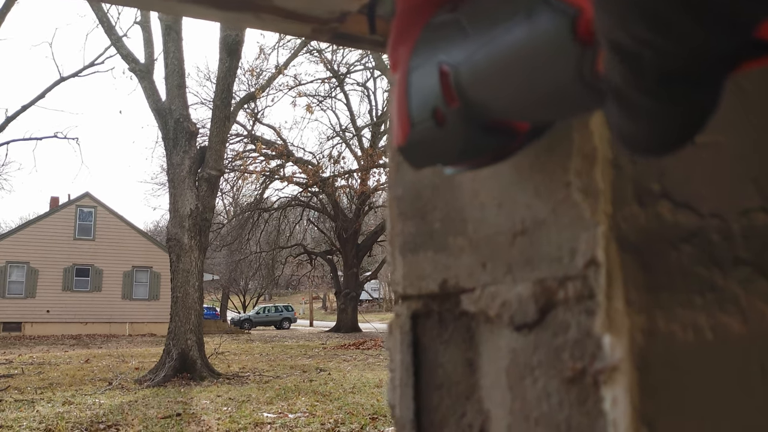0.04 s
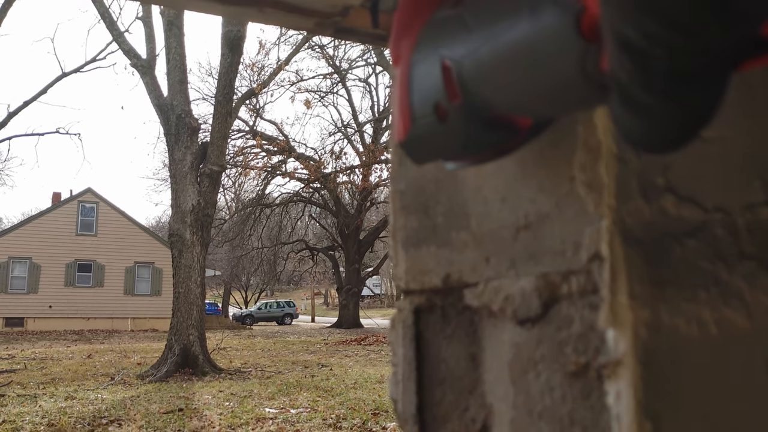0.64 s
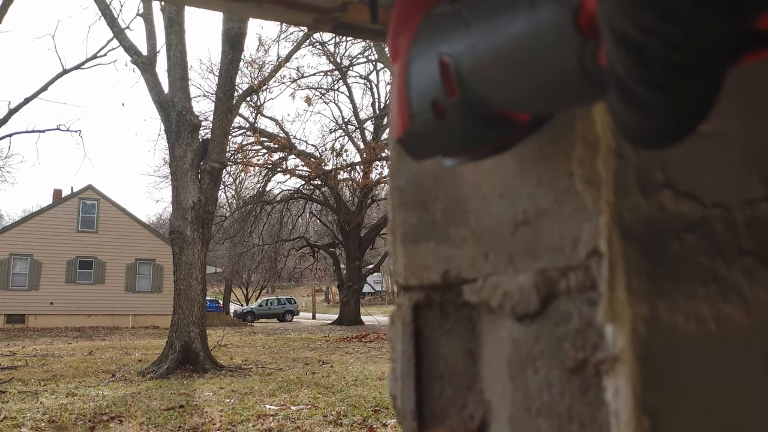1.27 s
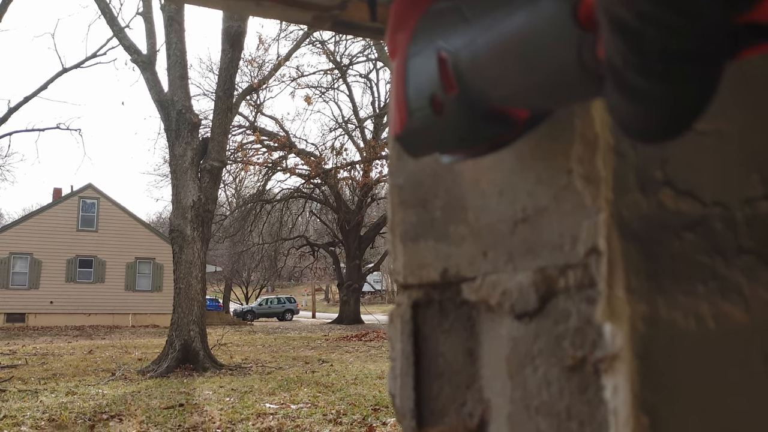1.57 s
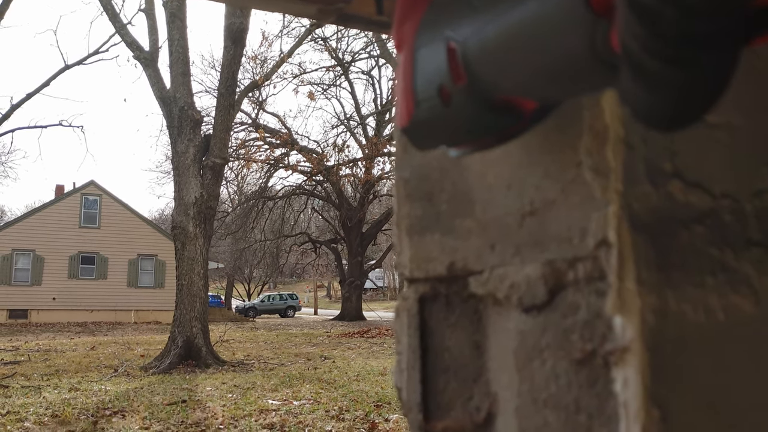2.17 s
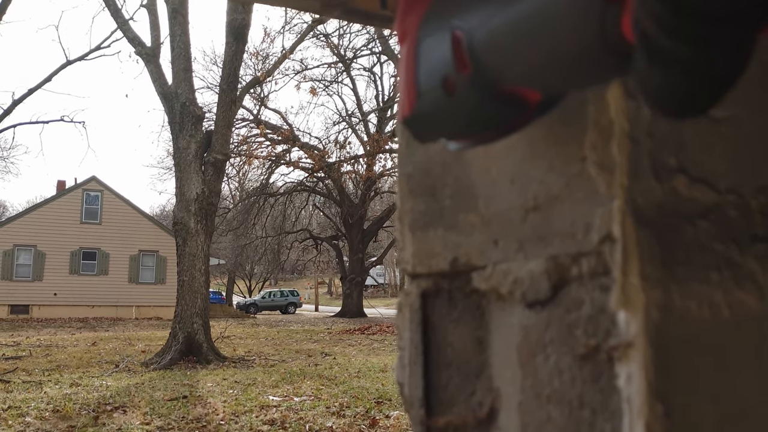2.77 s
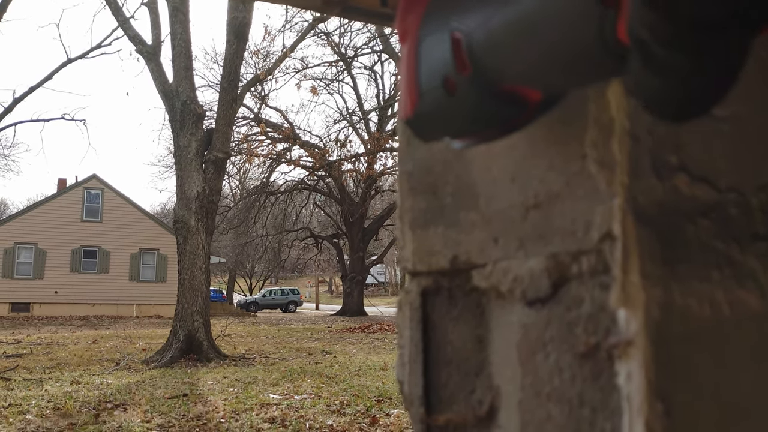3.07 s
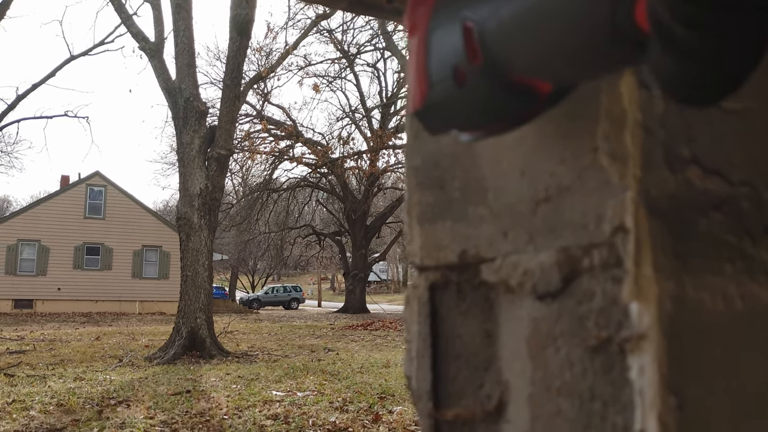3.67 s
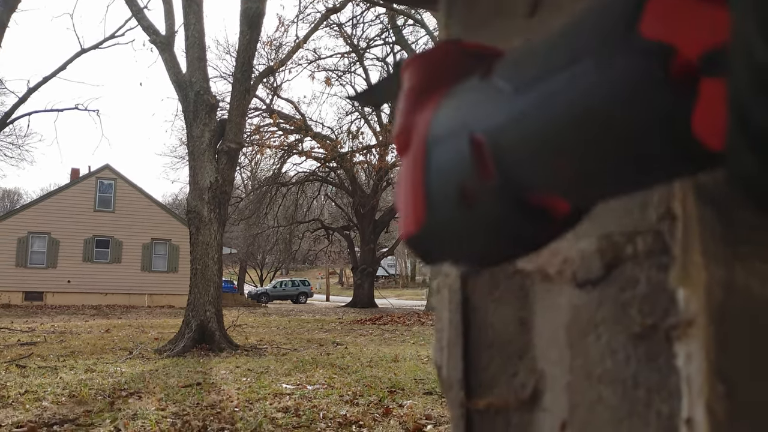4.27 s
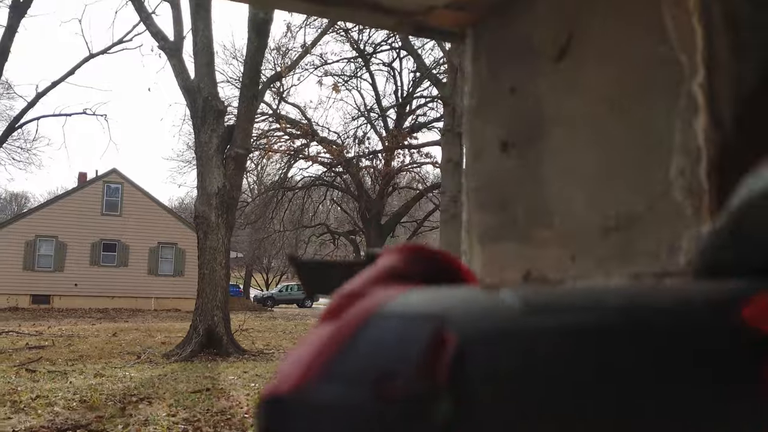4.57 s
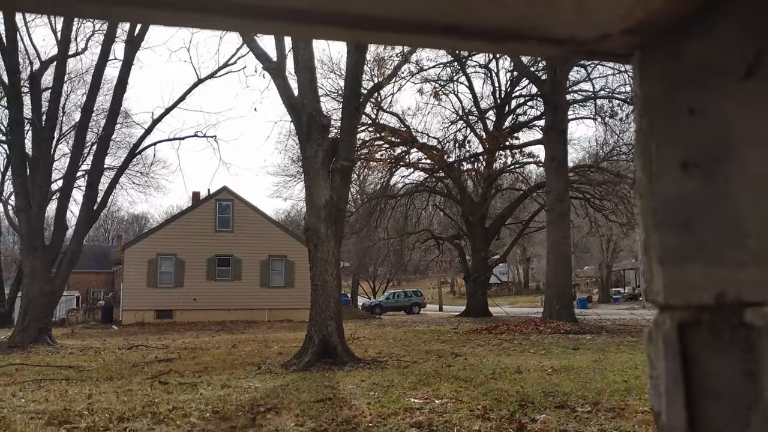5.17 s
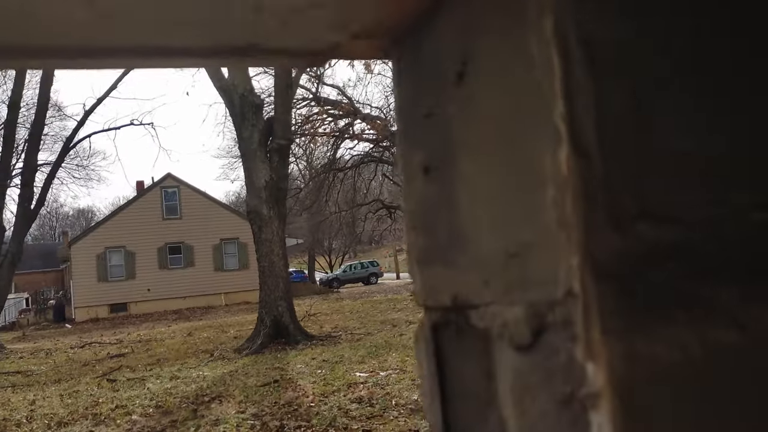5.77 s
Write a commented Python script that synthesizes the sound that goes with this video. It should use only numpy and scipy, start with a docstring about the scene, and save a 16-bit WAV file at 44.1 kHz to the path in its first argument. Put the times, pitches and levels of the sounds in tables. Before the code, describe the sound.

An oscillating power tool buzzes and rasps through nails in wood, runs free, clicks off and is set down with a thud.

```python
"""An oscillating multi-tool saws through nails in a wooden frame set in a block wall, heard close up.
Its periodic stroke forces casing, board and blade into a harmonic buzz; friction of the teeth adds a rasp.
The blade skips, breaks through, grazes the nail once more and swings free. The switch clicks, the motor
rattles to rest, the blade rings on in free vibration, and the tool lands on boards with a thud.
Behind it lie the faint air of a yard and a distant hum."""
import sys
import numpy as np
from scipy import signal
from scipy.fft import rfft, irfft
from scipy.io import wavfile

SR = 44100
rng = np.random.default_rng(int(sys.argv[2]) if len(sys.argv) > 2 else 0)


def master_out(mix):
    """Clip the mix to full scale and print it as 16-bit PCM to the path in sys.argv[1]."""
    frames = np.transpose(np.atleast_2d(mix))
    ceiling = np.clip(frames, -1, 1)
    pcm = np.round(ceiling * 32767).astype(np.int16)
    wavfile.write(sys.argv[1], SR, pcm)


N = 261954
TIME = np.arange(N) / SR
FRAMES = np.arange(0, N + 128, 128) / SR  # coarse time grid for slow changes
STROKE_HZ, BUZZ_FADE_DB = 243.5, -120  # running speed; level change by the end of the coast

# depth of the blade in the cut: time_s, depth (0-1)
CUT_DEPTH = [(1.8, 0.12), (2.1, 1)]
# effort of the hand: time_s, push_db
HAND_PUSH = [(0, 3.5), (1.1, 2.5), (1.35, 3), (1.8, 1.94), (2.3, 3.5), (2.9, 0.5), (3.1, 4), (3.25, 1.5),
             (3.52, 3), (3.75, 1)]
# the free tool swinging past the microphone: time_s, body_db, treble_db
FREE_SWING = [(4.2, -7, -3.5), (4.48, -6, -1.5), (4.63, 1, 1), (4.76, 0, 3), (4.9, -3, 2)]
# slack parts knocking as the motor coasts: time_s, level_db
COAST_KNOCKING = [(4.91, -100), (4.95, -55), (5.02, -72), (5.08, -57.5), (5.14, -87), (5.18, -110)]


def buzz(turns, hop, level_db=-0.82):
    """Forced vibration: a periodic stroke excites harmonics, recoloured by the load on the blade."""
    # stroke spectrum: harmonic, then left_db, right_db for each of shallow cut, deep cut, free blade
    harmonics = [(1, -48, -48, -52, -54, -63, -53), (2, -68, -68, -61, -59, -61, -53),
                 (3, -62, -57, -61, -55, -63, -63), (4, -47, -56, -48, -53, -59, -52),
                 (5, -45, -48, -46, -50, -64, -58), (6, -49, -65, -52, -59, -62, -51),
                 (7, -66, -63, -57, -54, -61, -47), (8, -52, -46, -53, -47, -61, -55),
                 (9, -56, -50, -56, -54, -59, -58), (10, -51, -49, -53, -45, -60, -53),
                 (11, -54, -50, -51, -52, -56, -52), (12, -53, -49, -57, -53, -63, -55),
                 (13, -52, -51, -56, -53, -66, -55), (14, -63, -66, -63, -64, -68, -62),
                 (15, -54, -53, -56, -56, -63, -61), (16, -60, -57, -62, -59, -71, -60),
                 (17, -57, -60, -61, -62, -67, -59), (18, -55, -59, -56, -59, -68, -65),
                 (19, -61, -57, -64, -62, -68, -64), (20, -58, -63, -55, -69, -66, -64),
                 (21, -56, -57, -54, -57, -60, -55), (22, -65, -66, -60, -62, -67, -63),
                 (23, -63, -64, -60, -60, -69, -67), (24, -62, -64, -66, -60, -70, -66),
                 (25, -75, -71, -63, -66, -74, -66), (26, -67, -61, -65, -60, -69, -63),
                 (27, -65, -62, -65, -60, -74, -69), (28, -66, -74, -62, -66, -74, -75)]
    # phase lead of the left channel: frequency_hz, cutting_rad, free_rad
    phase_lead = [(243, .7, -.2), (730, .9, -.5), (973, 0, -.5), (1217, 2.6, -1), (1460, 0, 1.5),
                  (1704, -3, .9), (2190, -3.1, .1), (2433, -4.1, -1.3), (2676, -6.5, 1.2), (2920, -8, -.1),
                  (3163, -8.2, .6), (3650, -5.9, 1.5), (4400, -6.3, -1.4), (6800, -6.6, .4)]
    speed_hz = motor(FRAMES)
    load, depth = contact(FRAMES)[0], curves(CUT_DEPTH, FRAMES)[0]
    parts_db = np.repeat(excitation(), [1, 2, 5, 20], axis=0)  # harmonics per part
    response = [(k * STROKE_HZ, *db) for k, *db in harmonics]  # resonances stay put as the motor slows
    skip = jolts()[1] * np.cos(np.pi * turns + 0.16 * wander(4.4, TIME))  # half the stroke rate
    limp = hop * (1 + skip)
    scatter = slipping() * np.interp(turns, np.arange(len(FRAMES)), rng.standard_normal(len(FRAMES)))
    shift_turns = .011 * (hop - 1) + .027 * skip + .016 * scatter
    flutter = 0.021 + 0.1 * jolts(FRAMES)[0]
    stroke = np.exp(2j * np.pi * (turns + shift_turns))
    wave, out = 1, np.zeros((2, N))
    for k, part_db in enumerate(parts_db, 1):
        wave, hz = wave * stroke, k * speed_hz
        shallow_db, deep_db, free_db = spectra(response, hz).reshape(-1, 2, len(hz))
        cutting_db = (1 - depth) * shallow_db + depth * deep_db
        db = load * cutting_db + (1 - load) * free_db + part_db + level_db
        tone = wave if k > 2 else np.exp(2j * np.pi * k * turns)  # the lowest two keep an even beat
        loose = min(k / 7, 1.2) * (.95 + .05 * load)  # high harmonics feel every change of contact
        lead_cut, lead_free = np.exp(1j * spectra(phase_lead, hz))
        lead = np.angle(load * lead_cut + (1 - load) * lead_free)
        # free strokes are sharper slaps; in the cut they smear over the cycle
        phase = rng.standard_normal() * (1.6 + .6 * load) + .3 * loose * wander(2)
        drift = amp(1.1 * loose * wander(3))
        shake = drift * (1 + flutter * loose * (wander(22) + 1j * wander(30)))
        # the board follows every skip and hop; low hum and blade whine only sway
        sway = 1 + 0.23 * (hop - 1) if k < 3 else limp if k < 8 else 1 + 0.12 * (limp - 1)
        for ear, side in enumerate((.5, -.5)):
            gain = amp(db[ear] + 1.3 * loose * wander(3)) * shake * np.exp(1j * (phase + side * lead))
            out[ear] += np.sqrt(2) * (np.interp(TIME, FRAMES, gain) * tone).real * sway
    return out


def motor(t=TIME, sag_hz=1.0, waver_hz=.15):
    """Stroke rate in Hz: it sags as the loaded blade skips, then runs down on inertia."""
    held_hz = STROKE_HZ - sag_hz * jolts(t)[1] * contact(t)[0] + waver_hz * wander(2, t)
    return held_hz * np.maximum(1 - coasted(t), 0) ** 1.15


def coasted(t=TIME, off_s=4.92, coast_s=.26):
    """Progress of the inertial run-down: 0 under power, passing 1 at standstill."""
    return np.maximum(t - off_s, 0) / coast_s


def contact(t=TIME):
    """Contact force on the blade, and the degree of grazing, which peaks at half load."""
    # pressure on the nail: time_s, load (0-1)
    blade_load = [(3.77, .97), (3.8, .3), (4.01, .3), (4.035, .55), (4.15, .55), (4.18, 0)]
    load = np.clip(curves(blade_load, t)[0], 0, 1)
    return load, 4 * load * (1 - load)


def excitation(t=FRAMES, severing_s=2.6, severing_rise_s=0.044):
    """Response to the driving force, in dB: low hum, casing drone, board buzz and blade whine."""
    # casing, board and blade: rest_db, db_per_push_db, full_skip_db, grazing_db
    parts = [(1, 0, -2.5, 2), (0.54, 0.61, -0.5, -6.5), (-4.5, 1.77, -1, -2.5)]
    # the fundamental: time_s, level_db
    low_hum = [(0, 1.5), (1.95, 1.5), (2.12, -1), (2.26, 5), (2.75, -4), (3.26, 4.5), (3.52, -2.5),
               (3.77, -1), (3.88, -3.5), (4.54, -10.5), (4.66, 6), (4.9, 2.5)]
    load, graze = contact(t)
    push, skip = curves(HAND_PUSH, t)[0], jolts(t)[1]
    body_db, treble_db = curves(FREE_SWING, t)
    casing, board, whine = [
        rest_db + load * follow * push + skip_db * skip + graze_db * graze + (1 - load) * swing_db
        for (rest_db, follow, skip_db, graze_db), swing_db in zip(parts, (body_db, body_db, treble_db))]
    whine = whine + load * np.clip((t - severing_s) / severing_rise_s, 0, 1)  # 1 dB up late in the cut
    return np.array([curves(low_hum, t)[0], casing, board, whine]) + BUZZ_FADE_DB * coasted(t) ** 2


def jolts(t=TIME, steady_hop=0.016, steady_skip=0.0405):
    """Intermittent contact: how far the tool hops and the blade skips every second stroke."""
    # losses of grip: start_s, length_s, hop (0-1), skip (0-1)
    lost_grip = [(.05, .22, .3, .1), (.27, .38, .56, .05), (.66, .13, .15, .35), (.79, .4, .17, .06),
                 (1.19, .28, .22, .05), (1.48, .19, .2, .7), (1.68, .13, .1, .5), (2.1, .29, .2, .02),
                 (2.44, .06, .1, .5), (3.06, .13, .42, .7), (3.2, .14, .25, .2), (3.42, .25, .25, .65),
                 (3.8, .23, .3, .4)]
    steady = np.outer([steady_hop, steady_skip], contact(t)[0])
    return np.clip(steady + spells(lost_grip, edge_s=0.038, t=t), 0, 1)


def bounce(depth=.9):
    """Amplitude modulation: the tool hops once in a few strokes, landing hard and easing off."""
    # pace of the hopping: time_s, rate_hz
    hop_rate = [(0, 56), (.6, 58), (.85, 68), (1.35, 76), (1.65, 52), (2.3, 63), (3.7, 70), (3.85, 40)]
    rate_hz = curves(hop_rate)[0] * (1 + .04 * wander(13.0, TIME))
    angle = 2 * np.pi * np.cumsum(rate_hz) / SR
    return np.maximum(1 + depth * jolts()[0] * (np.sin(angle) + .2 * np.sin(2 * angle)), 0)


def slipping():
    """Timing jitter, 0-1: the strokes scatter when the teeth leave their groove."""
    # jumps from the groove: start_s, length_s, scatter (0-1)
    slips = [(.26, .1, .55), (.46, .07, .5), (.69, .08, .7), (.88, .08, .45), (1.08, .08, .35),
             (1.24, .09, .6), (1.48, .33, .6), (2.17, .07, .4), (2.44, .06, .5), (2.72, .05, .25),
             (3.04, .15, 1), (3.19, .22, .55), (3.41, .23, .95), (3.64, .07, .4), (3.79, .04, .6),
             (3.92, .09, .5)]
    return np.clip(spells(slips, edge_s=.035)[0], 0, 1)


def rasp(turns, hop, split_hz=7700, grain_db=2.0):
    """Friction noise: each bite tears off chips, giving a rasp, a fine fizz and knocks in the board."""
    # friction spectrum: frequency_hz, cutting_left_db, cutting_right_db, free_left_db, free_right_db
    grit = [(493, -29.5, -16, -25, -6.5), (830, -26, -18, -29, -20.5), (944, -4.5, -10, 0.5, 0.5),
            (1370, -12.5, -7, -6, 0), (2340, -4, -1, -24, 0), (2550, -5, -6, -10.5, 0.5),
            (3340, -6.5, -5, -7.5, 0.5), (5110, -6, -9.5, -7, -6), (5500, -4.5, -6.5, -5.5, -3),
            (7730, -12, -11.5, -11.5, -17), (8640, -5, -27, -19, -22), (9970, -14, -17.5, -12, -13.5),
            (12120, -3.5, -7.5, -13, -23), (11600, -10, -15, -18, -10), (14600, -13.5, -12.5, -23.5, -25.5)]
    # response of the board: frequency_hz, gain_db
    wood = [(30, -26), (80, -13.5), (130, -10), (190, 17.5), (280, 10.5), (380, -13.5), (600, 10),
            (750, 16), (1000, -48), (2000, -12)]
    rasp_db, fizz_db, knock_db = friction()
    load, bite = contact()[0], bites(turns)
    chips = unit(amp(grain_db * np.repeat(rng.standard_normal(N // 16 + 1), 16)[:N]))
    metal = 0
    for kind, db, sway in (("low", rasp_db + 0.02, np.sqrt(hop)), ("high", fizz_db, 1)):
        scrape = retrace(pair(0.057), turns) * bite * chips * sway
        coloured = colour(np.vstack([scrape, scrape]), grit)
        cutting, free = band(coloured, split_hz, kind).reshape(2, 2, N)
        metal = metal + amp(db) * (load * unit(cutting) + (1 - load) * unit(free))
    knocking = amp(knock_db - 2) * unit(colour(pair(0.87) * bite * hop, wood))
    return band(metal, 520, "high", order=3) + knocking


def bites(turns, decay_turns=0.23, back=0.91, floor=0.69):
    """A pulse train: the teeth bite on the forward stroke and more lightly on the way back."""
    half = (2 * turns).astype(int)
    strength = np.where(half % 2, back, 1) * (1 + 0.4 * jolts()[1] * np.cos(np.pi * (half // 2)))
    return unit(floor + strength * np.exp(-(turns % .5) / decay_turns))


def retrace(noise, turns, shallow=.5, deep=.56, free=.78):
    """Comb filtering: in one groove each stroke partly repeats the last, so the hiss takes on a pitch."""
    stroke_before = np.minimum(np.searchsorted(turns, turns - 1 - .5 * np.gradient(turns)), N - 1)
    load, depth = contact()[0], curves(CUT_DEPTH)[0]
    memory = load * (shallow + (deep - shallow) * depth) + (1 - load) * free
    memory = np.clip(memory * (1 - slipping()) * (1 - 2 * coasted()), 0, 1) * (turns > 1)
    fresh, out = np.sqrt(1 - memory ** 2) * noise, noise
    for _ in range(8):
        out = fresh + memory * out[:, stroke_before]
    return unit(out)


def friction(shudder_db=7):
    """Friction follows contact force: dB of rasp, fizz and knocking, which die with the motor."""
    # rasp, fizz and knocking: cutting_db, free_db, db_per_push_db, full_hop_db
    levels = [(-43.5, -50.5, 1.07, 0), (-45.5, -64, 1.54, -1.5), (-65.5, -72, 1.5, 11.5)]
    load, hop, slowed = contact()[0], jolts()[0], coasted() ** 2
    push, treble_db = curves(HAND_PUSH)[0], curves(FREE_SWING)[1]
    coarse, fizz, knock = [
        load * (cut_db + follow * push) + (1 - load) * (free_db + treble_db) + hop_db * hop
        for cut_db, free_db, follow, hop_db in levels]
    knock = np.maximum(knock, curves(COAST_KNOCKING)[0] + shudder_db)  # braking shakes the board too
    return (coarse + scraping() - 44 * slowed,
            fizz + scraping() - 77.5 * slowed,
            knock + BUZZ_FADE_DB * slowed)


def scraping():
    """Sliding friction changes, in dB, as the teeth glide or the tip scratches the cut end."""
    # glides and scratches: start_s, length_s, change_db
    scrapes = [(-.03, 0.065, -1.5), (1.92, 0.22, -1.5), (2.75, 0.25, 0.5), (3.05, 0.1, -0.5),
               (3.86, 0.022, 3.5), (4.045, 0.085, 2.5)]
    return spells(scrapes, edge_s=0.0067)[0]


def squeal(x, share=1):
    """Resonance: as the grip changes, modes of nail, board or blade lift the sound near their pitch."""
    # resonances singing out: start_s, length_s, pitch_hz, width_hz, lift_db
    resonances = [(-.05, .55, 3655, 120, 4), (.19, .43, 1950, 130, 3), (.27, .6, 2920, 130, 4.5),
                  (.25, .6, 4385, 130, 3), (.66, .13, 1460, 120, 5), (.98, .49, 2680, 130, 5),
                  (1.18, .24, 975, 120, 4.5), (1.2, .68, 3655, 130, 4), (1.46, .24, 1400, 250, 4),
                  (1.46, .34, 2900, 250, 3), (1.79, .12, 2670, 150, 4), (1.94, .22, 2920, 160, 8.5),
                  (1.94, .25, 3165, 130, 7.5), (1.92, .3, 2450, 200, 4.5), (2.21, .21, 2680, 450, 6.5),
                  (2.43, .45, 2440, 170, 9), (1.92, .2, 6570, 300, 8), (2.72, .3, 1945, 120, 4),
                  (2.78, .24, 4870, 200, 8), (2.8, .22, 4385, 150, 6.5), (2.88, .17, 2435, 180, 4),
                  (3.08, .08, 2250, 700, 3), (3.41, .24, 605, 80, 7), (3.83, .08, 2435, 100, 7),
                  (4.03, .14, 2435, 90, 15), (4.035, .135, 7400, 700, 6), (4.16, .22, 1705, 120, 6),
                  (4.38, .26, 1705, 120, 2.5), (4.5, .36, 2500, 300, 3), (4.54, .18, 1465, 120, 6.5),
                  (4.7, .22, 730, 90, 4), (4.7, .24, 5115, 200, 5), (4.7, .24, 6330, 200, 6)]
    for start_s, length_s, hz, width_hz, db in resonances:
        x = lift(x, hz, width_hz, share * spells([(start_s, length_s, db)], edge_s=.05)[0])
    return x


def blade_knocks():
    """Impact: the blade strikes the board as it breaks through."""
    # strikes: start_s, level_db
    strikes = [(3.805, -44.5), (3.94, -42), (3.981, -43), (4.022, -44)]
    # response of the struck board: frequency_hz, gain_db
    response = [(100, -33), (250, 9), (400, -12), (650, 9), (1000, -2), (1700, 1), (3000, -10), (8000, -37)]
    force = bursts([(s, db - 1, .005) for s, db in strikes])
    return colour(pair(0.51) * force, response)


def fan_and_blade(turns, blade_hz=7553, free_db=-81, graze_db=-66, release_s=5.1, decay_db_per_s=100):
    """The fan's tones follow the motor; the blade rings at its natural frequency, most when grazing."""
    # whistle of the cooling fan: stroke_multiple, level_db
    fan_tones = [(39, -76), (52, -86)]
    running = np.interp(TIME, FRAMES, amp(np.minimum(excitation()[3], 0)))
    load, graze = contact()
    fan = sum(amp(db + 2 * wander(14, TIME)) * np.sin(2 * np.pi * k * turns + 0.48 * wander(20, TIME))
              for k, db in fan_tones)
    struck = (1 - load) * amp(free_db) + graze * 2 * load * amp(graze_db + scraping())
    fade = amp(-decay_db_per_s * np.maximum(TIME - release_s, 0))
    ring = struck * fade * np.sin(2 * np.pi * blade_hz * TIME + 2.5 * running * wander(60, TIME))
    return np.sqrt(2) * (fan * running + ring * amp([[2], [-3]]))


def rattle(turns):
    """Impulse response: each slowing half stroke knocks the gear casing, whose damped modes ring."""
    # modes of the casing: pitch_hz, level_db, t60_s
    modes = [(1250, -5, .02), (1615, 0, .03), (2060, -7, .13), (2470, -3, .025), (3100, -3, .015),
             (3630, 0, .016), (5020, -10, .04)]
    reversals = np.diff(np.floor(2 * turns), prepend=0) > 0
    knocks = reversals * amp(3 * rng.standard_normal(N) + curves(COAST_KNOCKING)[0])
    t = TIME[:SR // 8]
    ring = sum(amp(db - 60 * t / t60) * np.sin(2 * np.pi * (hz * t + rng.random((2, 1))))
               for hz, db, t60 in modes)
    ring = unit(ring) * np.sqrt(SR / STROKE_HZ / len(t))
    return signal.oaconvolve(knocks[None], ring, axes=1)[:, :N] * amp([[-4], [2]])


def switch_clicks():
    """Brief impacts have broad spectra: the switch snaps and the drive gives its last knocks."""
    # clicks: start_s, level_db, decay_s
    clicks = [(4.891, -29, 0.0014), (5.053, -49, 0.0044), (5.078, -79.5, 0.0038), (5.12, -78, .002),
              (5.14, -83, 0.0019)]
    # their spectrum: frequency_hz, gain_db
    response = [(100, -22), (300, -10), (900, -9), (2300, 0), (4000, -2), (6500, -1), (8000, -17),
                (15000, -26)]
    return colour(pair(0.11) * bursts(clicks), response) * amp([[-2], [2]])


def frame_bumps():
    """Soft impacts excite low frequencies: the tool's body bumps the frame."""
    # bumps: start_s, level_db, decay_s
    bumps = [(3.08, -68, 0.054), (3.14, -56, 0.046), (3.24, -67, 0.081), (3.59, -53.5, 0.034),
             (4.73, -68, 0.067)]
    # their spectrum: frequency_hz, gain_db
    response = [(30, -42), (70, -25), (110, -8.5), (150, -5), (250, -9), (800, -39)]
    return colour(pair(0.89) * bursts(bumps), response)


def thud(modes_db=-14, room_db=-8):
    """Impact excites normal modes: the tool lands on one edge, then flat, and the boards boom."""
    # landings: start_s, level_db, decay_s
    landings = [(5.669, -66, .008), (5.6785, -38, .004), (5.688, -37, .006), (5.697, -37, .004),
                (5.716, -46, .005)]
    # spectrum of the blow: frequency_hz, gain_db
    response = [(24, -45), (40, -12), (84, -8), (442, -2), (532, 0), (718, -17), (884, -9), (1370, -27.5),
                (1500, -25), (2810, -29), (3080, -34), (4060, -42), (10000, -71), (13000, -106),
                (22000, -120)]
    # modes of the boards: pitch_hz, level_db, t60_s
    modes = [(83, 0, 0.33), (179, -2.5, 0.19), (400, -10.5, 1), (483, -17, 0.3), (621, -17, 0.8),
             (634, -19, 0.3), (890, -27, .35)]
    force, t = bursts(landings), TIME[:SR // 2]
    blow = colour(pair(0.53) * force, response)
    ring = sum(amp(db - 60 * t / t60) * np.sin(2 * np.pi * hz * t) for hz, db, t60 in modes)
    onsets = np.maximum(np.diff(force, prepend=0), 0)
    boom = signal.fftconvolve(onsets, ring)[:N]
    return (blow + amp(room_db) * room(blow) + amp(modes_db) * boom) * amp([[-2], [2]])


def room(x):
    """Reverberation: a diffuse tail between block walls, each band decaying at its own rate."""
    # reverberation time: frequency_hz, t60_s
    decay_times = [(70, 0.29), (180, 1), (490, 0.45), (1290, 0.58), (3400, .33), (8000, 0.87)]
    hz, t, noise = signal.stft(rng.standard_normal((2, SR // 2)), SR, nperseg=256)
    tail = signal.istft(noise * amp(-60 * t / spectra(decay_times, hz).T), SR, nperseg=256)[1]
    tail = tail + .5 * tail[::-1]
    return signal.fftconvolve(x, tail / np.linalg.norm(tail[0]), axes=1)[:, :N]


def yard(air_db=-92.5):
    """Ambient noise: still air and the wavering tones of a distant hum."""
    # spectrum of the air: frequency_hz, gain_db
    air = [(18, -73.5), (30, -26.5), (59, -26.5), (71, -21.5), (122, -4), (147, -28), (185, -33),
           (355, -15.5), (394, -29.5), (15000, -51)]
    # distant hum: pitch_hz, level_db
    tones = [(91.5, -104), (119, -98), (242, -113), (360.7, -107)]
    hum = sum(amp(db + wander(7.2, TIME)) * np.sqrt(2) * np.sin(2 * np.pi * (hz * TIME + rng.random()))
              for hz, db in tones)
    return amp(air_db) * unit(colour(pair(0.38), air)) + hum


def amp(db):
    """Decibels to amplitude."""
    return 10 ** (np.asarray(db) / 20)


def unit(x):
    """Normalisation to rms 1."""
    return x / np.sqrt(np.mean(abs(x) ** 2) + 1e-30)


def curves(rows, t=TIME):
    """Linear interpolation of a table's columns in time."""
    s, *columns = np.transpose(rows)
    return [np.interp(t, s, c) for c in columns]


def spectra(rows, hz):
    """Interpolation of a table's columns in log frequency."""
    f, *columns = np.transpose(rows)
    return np.array([np.interp(np.log(hz + 1), np.log(f + 1), c) for c in columns])


def spells(rows, edge_s, t=TIME):
    """Trapezoidal envelopes: the values in each row swell, hold and fade."""
    return sum(np.outer(values, np.clip(.5 + np.minimum(t - s, s + length - t) / edge_s, 0, 1))
               for s, length, *values in rows)


def bursts(rows):
    """Sudden onsets with exponential decay."""
    return sum(amp(db) * (TIME >= s) * np.exp(-abs(TIME - s) / decay) for s, db, decay in rows)


def wander(rate_hz, t=FRAMES):
    """Random drift: low-passed noise of rms 1."""
    noise = rfft(rng.standard_normal(len(FRAMES)))
    hz = np.fft.rfftfreq(len(FRAMES), FRAMES[1])
    return np.interp(t, FRAMES, unit(irfft(noise / (1 + (hz / rate_hz) ** 2), len(FRAMES))))


def pair(correlation):
    """Partly coherent white noise, left and right."""
    a, b = rng.standard_normal((2, N))
    return np.array([a, correlation * a + np.sqrt(1 - correlation ** 2) * b])


def colour(x, rows, size=2048):
    """Minimum-phase filters of unit mean power gain, one for each dB column."""
    log_gain = np.log(amp(spectra(rows, abs(np.fft.fftfreq(size, 1 / SR)))))
    taps = np.fft.ifft(np.exp(np.conj(signal.hilbert(log_gain)))).real
    return signal.oaconvolve(x, taps / np.sqrt((taps ** 2).sum(1).mean()), axes=1)[:, :N]


def band(x, hz, kind, order=6):
    """Low-pass or high-pass filter."""
    return signal.sosfilt(signal.butter(order, hz, kind, fs=SR, output="sos"), x)


def lift(x, hz, width_hz, db):
    """A resonator raises or lowers a narrow band."""
    return x + (amp(db) - 1) * signal.lfilter(*signal.iirpeak(hz, hz / width_hz, fs=SR), x)


def scene():
    """Superposition of all sources; one stroke phase drives the tool's moving parts."""
    turns = np.cumsum(motor()) / SR  # stroke cycles completed
    hop = bounce()
    impacts = switch_clicks() + frame_bumps()
    tones = lift(squeal(buzz(turns, hop)), hz=845, width_hz=80, db=-10)  # dip between two board modes
    sawing = tones + squeal(rasp(turns, hop), share=.55)
    return sawing + blade_knocks() + fan_and_blade(turns) + rattle(turns) + impacts + thud() + yard()


def record(dry, bass_cut_hz=35, edge_hz=15830):
    """Band limiting: the microphone cuts the deep bass and the highest treble."""
    low_pass = signal.firwin(511, edge_hz, window=("kaiser", 9), fs=SR)
    return signal.oaconvolve(band(dry, bass_cut_hz, "high", order=3), low_pass[None], "same")


dry = scene()
out = record(dry)
master_out(out)
```